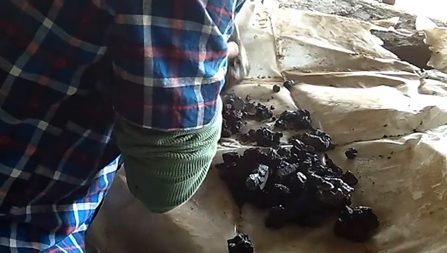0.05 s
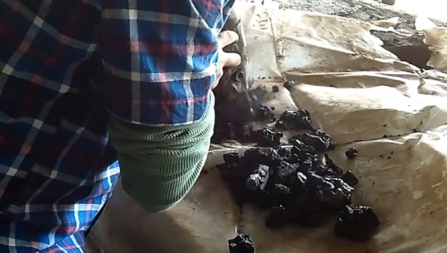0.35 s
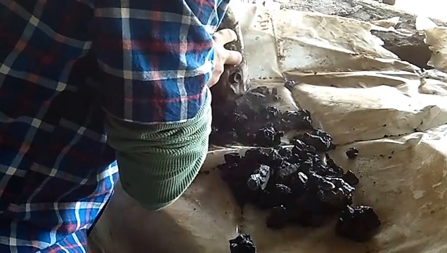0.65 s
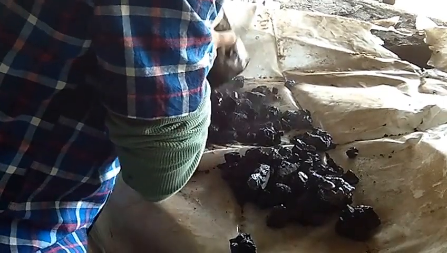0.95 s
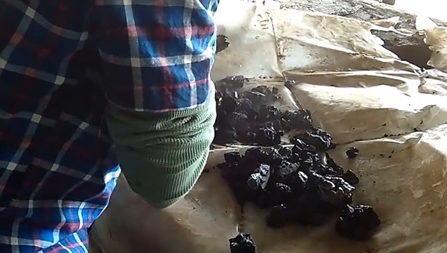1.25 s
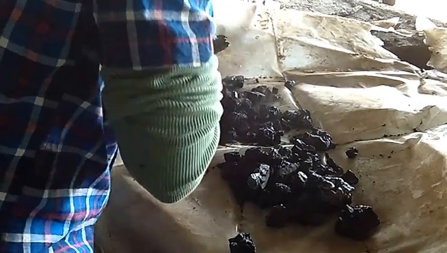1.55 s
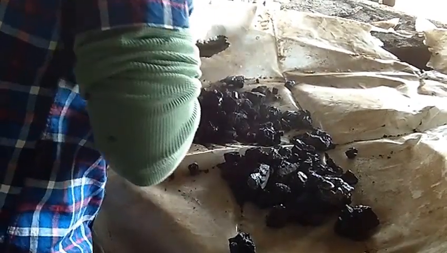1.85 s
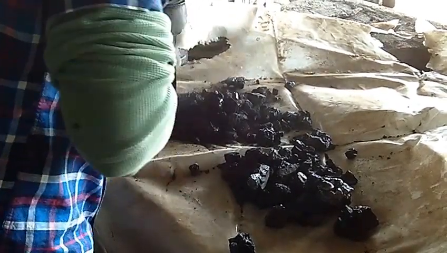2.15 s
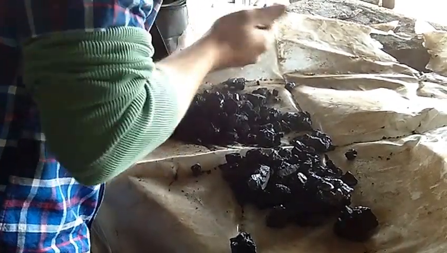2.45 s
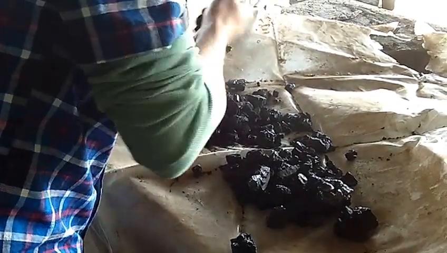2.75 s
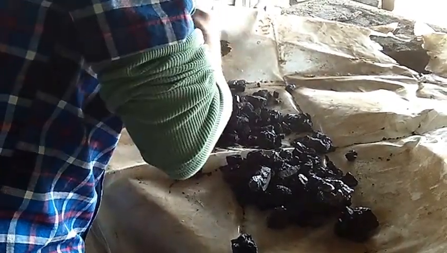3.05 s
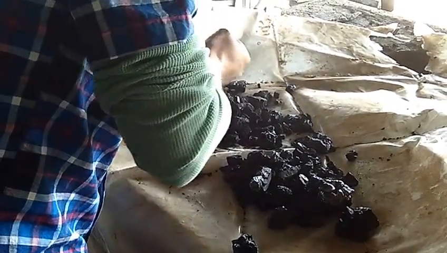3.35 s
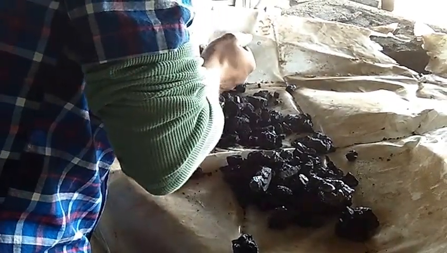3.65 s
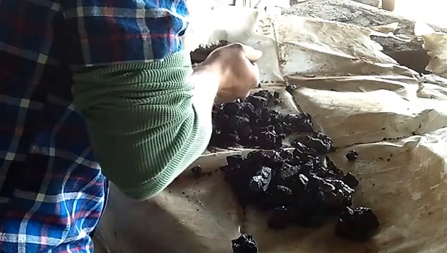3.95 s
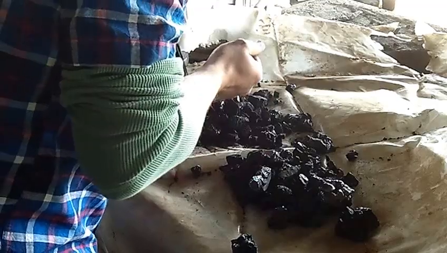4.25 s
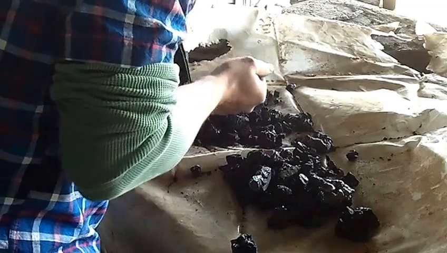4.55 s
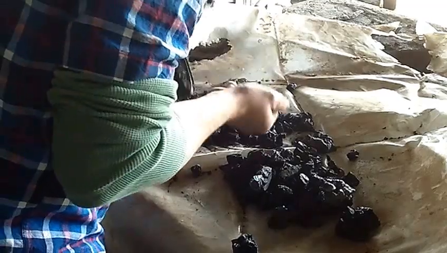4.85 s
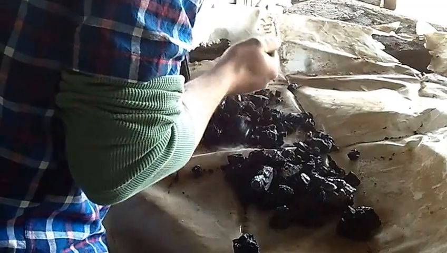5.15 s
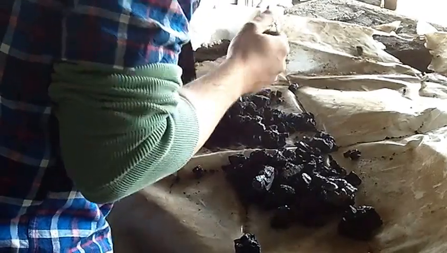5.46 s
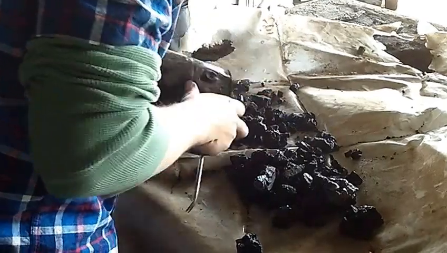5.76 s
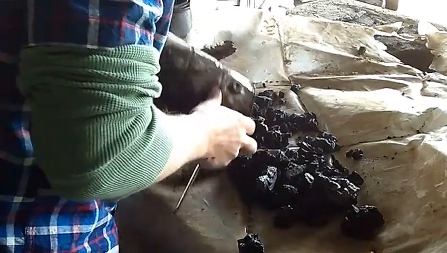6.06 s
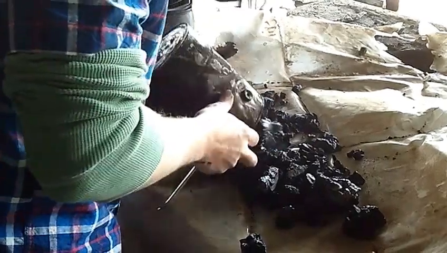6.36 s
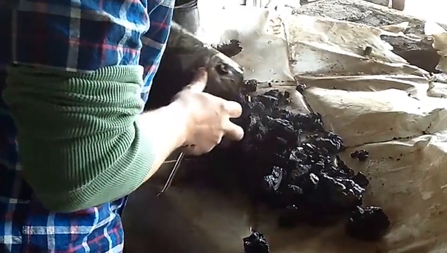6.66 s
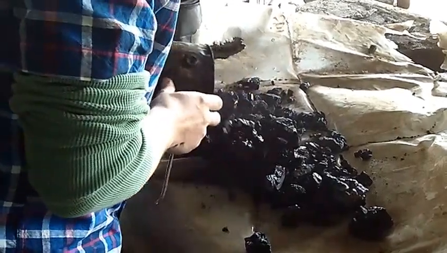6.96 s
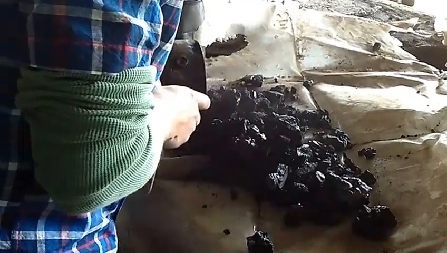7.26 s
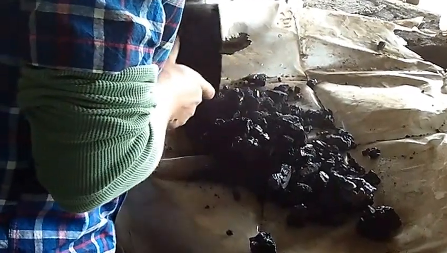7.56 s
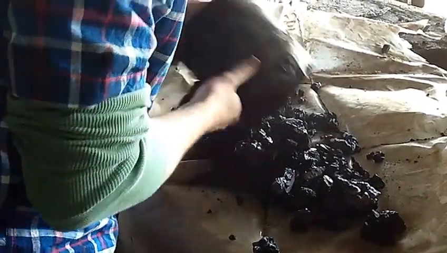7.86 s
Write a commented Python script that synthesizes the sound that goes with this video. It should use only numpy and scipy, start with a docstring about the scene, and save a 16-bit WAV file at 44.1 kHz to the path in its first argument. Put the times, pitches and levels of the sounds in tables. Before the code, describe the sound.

Baked coal lumps crack, crunch and slide out of a booming metal can onto a plastic sheet in bursts, close up in a shed.

```python
"""In a shed, close to one microphone: baked coal is worked loose in a metal can and tipped onto plastic.
Lumps crack, crush and slide in bursts; crumbs tick onto the plastic sheet after them.
The can booms and clinks when knocked, grates when coal rubs its wall and hums as lumps roll in it.
Near walls add a short, dull reverberation; between bursts, handling rustles over still air."""
import sys
import numpy as np
from scipy import signal
from scipy.fft import rfft, irfft
from scipy.io import wavfile
from scipy.ndimage import uniform_filter1d

SR = 44100
rng = np.random.default_rng(int(sys.argv[2]) if len(sys.argv) > 2 else 0)


def wav_record(signal):
    """Record a signal, one row per channel, as 16-bit PCM in the file named by sys.argv[1]."""
    frames = np.transpose(np.atleast_2d(signal))
    bounded = np.clip(frames, -1, 1)
    # unit amplitude maps onto the largest positive 16-bit level
    quanta = np.round(bounded * 32767).astype(np.int16)
    wavfile.write(sys.argv[1], SR, quanta)


N = 358091
TIME = np.arange(N) / SR

# spectrum of breaking coal: frequency_hz, density_db
COAL_SPECTRUM = [(30, -59.5), (70, -39), (120, -12), (165, -10), (210, 0), (290, -6), (420, -1), (650, -4),
                 (1250, 5), (2600, -1.5), (3800, -9.5), (6100, -15.5), (9000, -29.5), (16000, -45)]


def cracking_lumps(body_db, grit_db, hiss_db, first_break, thud_linger, lump_ring):
    """A lump cracks: a sharp break, a dying spray of splinters and five short modes of its own."""
    # single lumps snapping or landing: start_s, grit_db, body_db, hiss_db, t60_s
    cracks = [(.027, -26, -41, -52, 0.106), (.074, -35.5, -32.5, -47, 0.0345),
              (.155, -20, -49.5, -50, .028), (.19, -23.5, -30.5, -36.5, 0.24),
              (.39, -1, -18.5, -17.5, 0.0624), (.412, -4, -28.5, -20.5, 0.061),
              (.498, -24, -35, -42.5, 0.034), (0.767, -34, -52.5, -52, 0.041),
              (.848, -35, -53.5, -44.5, 0.042), (0.879, -36.5, -34.5, -64.5, 0.0355),
              (.934, -35.5, -36.5, -66, 0.068), (1.01, -30, -49.5, -44, 0.021),
              (1.025, -33, -36, -65.5, 0.048), (1.08, -27, -56.5, -46.5, 0.044),
              (1.251, -37.5, -47.5, -44.5, 0.034), (1.545, -24.5, -47.5, -48, 0.0254),
              (1.549, -7.5, -32, -26, 0.0395), (1.627, -28.5, -34.5, -45, 0.039),
              (1.709, -28, -39, -68.5, 0.026), (2.423, -27, -49.5, -41, 0.093),
              (2.517, -31, -49, -57.5, 0.051), (2.643, -36, -47, -54, 0.063),
              (3.025, -17, -31.5, -45, 0.051), (3.161, -14.5, -28.5, -34, 0.0555),
              (3.214, -16, -48.5, -32, 0.08), (3.258, -14, -33, -24, 0.0515),
              (3.281, -16.5, -55, -23, 0.0365), (3.324, -13.5, -48, -28.5, 0.065),
              (3.461, -10.5, -28, -26.5, .037), (3.498, -8, -35, -24.5, 0.038),
              (3.549, -6, -35.5, -21, 0.0638), (3.733, -29, -49.5, -45, 0.045),
              (3.808, -18, -39.5, -40, 0.066), (3.988, -32, -47, -42.5, 0.22),
              (4.063, -34, -41, -53, 0.027), (4.169, -23, -51.5, -37, 0.043),
              (4.201, -18.5, -39, -36.5, 0.127), (4.298, -13.5, -36.5, -27.5, 0.043),
              (4.435, -22, -47, -38, 0.107), (4.47, -19.5, -42.5, -33.5, 0.113),
              (4.672, -14.5, -32.5, -31, .086), (4.69, -33.5, -29.5, -25, 0.031),
              (4.721, -10, -36.5, -21, 0.0376), (4.811, -23.5, -48.5, -32.5, 0.056),
              (4.836, -22, -30, -36.5, 0.092), (4.879, -24.5, -32.5, -27, 0.085),
              (4.931, -19.5, -22, -28, 0.082), (4.979, 3.5, -8.5, -12, 0.035), (4.992, -9, -30, -26, 0.058),
              (5.02, -1, -17, -21.5, 0.0145), (5.134, -36, -45, -33, 0.028),
              (5.15, -9, -25.5, -38.5, 0.057), (5.259, -11.5, -31, -36, 0.045),
              (5.293, -22.5, -25, -38, 0.0496), (5.348, -17.5, -25.5, -48, 0.062),
              (5.491, -22.5, -55, -54.5, .02), (5.987, -12.5, -18.5, -34, 0.0584),
              (6.395, -6.5, -15, -22, 0.081), (6.406, -5.5, -16.5, -38, 0.0285),
              (6.45, 0.5, -17, -47.5, 0.0405), (6.575, -3.5, -47.5, -24, 0.036),
              (6.589, -11.5, -46, -16, 0.0424), (6.901, -18.5, -34.5, -52.5, 0.13),
              (6.925, -14.5, -31.5, -58, 0.042), (7.053, -28, -36, -38.5, 0.042),
              (7.114, -25.5, -36.5, -42, 0.086), (7.209, -23.5, -38, -50.5, .035),
              (7.65, -41, -47, -48, 0.046), (8.103, -13, -58, -29.5, 0.074)]
    t, out = TIME[:SR // 8], np.zeros(N)
    sprays = []
    for *_, t60 in cracks:
        spray = rng.standard_normal(len(t)) * from_db(-60 * t / t60)
        spray[0] += first_break * rng.choice([-1, 1])
        pitches = 800 * 2 ** rng.uniform(0, 2.6, 5)
        modes = sum(resonate(spray, hz, width_hz=230) for hz in pitches)
        sprays.append(spray + lump_ring * modes)
    breaks = butterworth(colour(np.concatenate(sprays), COAL_SPECTRUM), 2, 167, "high")
    bands = [band.reshape(len(cracks), -1) for band in registers(breaks)]
    for (s, crack, thud, snap, t60), body, grit, hiss in zip(cracks, *bands):
        body = body * (1 + thud_linger * t / t60)
        for band, db in ((body, thud + body_db), (grit, crack + grit_db), (hiss, snap + hiss_db)):
            add(out, s, band / local_rms(band, .004).max() * from_db(db))
    return out


def crushing_clumps(body_db, hiss_db, dust_db):
    """A clump gives way in a rush of fractures. Returns the crunch and its rubbing on the can's wall."""
    # crumbling clumps: peak_s, level_db, decay_s, brightness_db, rubbing_db
    crushes = [(0.088, -42.5, 0.0438, 4.5, -24), (0.254, -29.5, 0.0175, 1, -22),
               (0.293, -28.5, .027, 5.5, -17.5), (0.425, -19.5, 0.0178, 3.5, -14),
               (1.419, -46, 0.0318, 0.5, -16.5), (1.569, -37.5, 0.0165, 8, 7.5),
               (3.136, -45, 0.0424, 7.5, 8), (3.295, -36.5, 0.0296, 11, -1),
               (3.46, -38, 0.0254, 9.5, -10.5), (3.506, -31.5, 0.0363, 9.5, -1),
               (4.067, -34.5, 0.0127, 3, -10.5), (4.275, -46, 0.0526, 9.5, 4.5),
               (4.701, -40.5, 0.0368, 13.5, -4.5), (4.896, -34, 0.027, 9.5, -11),
               (4.937, -29.5, 0.0222, -1.5, -17), (5.008, -24, 0.0313, 3.5, -11),
               (5.304, -37.5, 0.0516, -3, -14), (5.92, -41, 0.0228, 8, -8),
               (6.125, -44.5, 0.0252, 7.5, -16), (6.195, -31.5, 0.0199, 9, -11),
               (6.227, -24.5, 0.0328, 8.5, -24.5), (6.355, -26.5, 0.0157, 2.5, -23.5),
               (6.409, -18.5, 0.02894, 7.5, -30.5), (6.579, -34, 0.031, 1.5, -10.5),
               (6.815, -37, 0.031, 9, 5), (7.22, -47, 0.0235, 2, -15.5), (8.079, -42, 0.081, 7.5, -3)]
    fractures = registers(grains(per_s=9000, spread_db=3.0, sharpness=7.07, tick=0.897))
    body, grit, hiss = (band / local_rms(band, 0.034) for band in fractures)
    dust = rms_one(butterworth(rng.standard_normal(N), 2, 8000, "high"))
    force, brightness, rubbing = np.zeros((3, N))
    t = TIME[:SR // 2] - .15   # zero at the peak
    for s, db, decay_s, bright_db, wall_db in crushes:
        rise_s = 0.614 * decay_s
        swell = from_db(db) * np.exp(-np.where(t < 0, (t / rise_s) ** 2, t / decay_s))
        swell = np.interp(TIME, s + t, swell, left=0, right=0)
        force += swell
        brightness += swell * from_db(bright_db)
        rubbing += swell * from_db(wall_db)
    treble = from_db(hiss_db) * hiss + from_db(dust_db) * dust
    return force * (grit + from_db(body_db) * body) + brightness * treble, rubbing * grit


def sliding_heaps(gain_db, tumble_db):
    """Fine crumbs slide along the can while a few larger pieces roll over them."""
    # heaps slipping: peak_s, level_db, swell_s, fade_s, body_db, hiss_db (the last two against the grit)
    slides = [(0.04, -48.5, -1.79, -0.35, -3.5, -12.5), (0.46, -33, 0.3961, 0.4549, -3.5, -7),
              (1.16, -47, 0.08, 0.2748, -2, -8), (1.56, -48.5, 0.23, .5, -0.5, -6),
              (1.85, -56, 0.02, 0.1, 2, -12), (3.2, -48, 0.2129, 0.27, -4.5, -3.5),
              (3.48, -42.5, 0.0968, 0.2865, -4.5, -4), (4.22, -47, 0.5272, .5, -7.5, -4),
              (4.62, -51, 0.58, 0.55, -7, -3), (4.97, -35.5, 0.35, 0.3417, -4, -8),
              (5.32, -43.5, 0.21, 0.5265, -2.5, -11), (5.9, -49, 0.1678, 0.42, 0.5, -4),
              (6.38, -35.5, 0.2245, 0.18, 3.5, -17.5), (6.6, -31.5, 0.36, .5, -4, -5),
              (6.82, -41, 0.36, .5, -2.5, -7), (8.11, -53, -5.4, -0.13, -12, -5)]
    fine = grains(per_s=3500, spread_db=3.0, sharpness=5.25, tick=1.0)
    tumbling = grains(per_s=330, spread_db=3.5, sharpness=5.0, tick=0.37, top_hz=4005)
    power = np.zeros((3, N))
    for s, db, swell_s, fade_s, body_db, hiss_db in slides:
        slip = swell_and_fade(s, db + gain_db, swell_s, fade_s)
        power += np.outer(from_db([body_db, 0, hiss_db]), slip) ** 2
    bands = registers(fine + from_db(tumble_db) * tumbling)
    return sum(band / local_rms(band, 0.074) * flow for band, flow in zip(bands, np.sqrt(power)))


def grains(per_s, spread_db, sharpness, tick, top_hz=10000):
    """Random contacts of uneven size: each is a tick plus the brief ring of one coal fragment."""
    sizes = from_db(spread_db * np.minimum(rng.exponential(1, N), 4.0)) * rng.choice([-1, 1], N)
    clicks = sizes * (rng.random(N) < per_s / SR)
    pitches = np.geomspace(300, top_hz, 22)
    fragment = rng.integers(0, len(pitches), N)
    rings = sum(resonate(clicks * (fragment == k), hz, hz / sharpness) for k, hz in enumerate(pitches))
    return colour(rms_one(rings) + tick * rms_one(clicks), COAL_SPECTRUM)


def ringing_can(push, knock_db):
    """Each blow wakes the modes near its own pitch; coal pushing on the wall drives all of them."""
    # modes of the can's wall and the air in it: pitch_hz, level_db, t60_s
    modes = [(219.2, -8, 0.082), (227.67, -2.5, 0.2015), (340.8, 0.5, 0.094), (382.7, 2.5, 0.19),
             (407, -6.5, 0.43), (495.6, -2.5, 0.253), (669.2, -3, 0.18), (766, -29.5, 0.37),
             (882.5, -6, 0.5), (929.6, -2.5, 0.235), (1290, -17, 0.6), (1379.8, -2, 0.117),
             (1577.2, 3.5, 0.049), (1688, 5, .2), (1833.4, 4, 0.055), (2098.3, 2, 0.054), (2249, -1, 0.1),
             (2520, 0, 0.39), (2848, 2, 0.21), (3290, -4.5, 0.19), (3776, -6, 0.099), (3849, 2.5, 0.052),
             (5100, -6, 0.075), (5220, -11, 0.15), (5305, -11, 0.12), (6403, -15, 0.15),
             (6500, -13.5, 0.13), (9110, -12.5, 0.16)]
    # blows on the can: start_s, level_db, centre_hz, reach_octaves
    knocks = [(0.249, -34.5, 243, 0.99), (0.39, -27, 2930, 0.196), (0.417, -28.5, 265, 0.234),
              (0.499, -23, 943, 0.19), (0.877, -35.5, 660, 0.18), (1.023, -49, 407, 1.2),
              (1.549, -39.5, 1090, 0.59), (1.552, -28, 4675, 1.29), (1.627, -36.5, 709, 0.325),
              (2.517, -42, 971, 0.69), (2.643, -54, 426, 0.79), (3.026, -33.5, 338.5, 0.6),
              (3.128, -28.5, 933, 0.19), (3.159, -28, 294.7, 0.384), (4.064, -47.5, 372, 0.68),
              (4.931, -28, 324, 1.18), (4.98, -31.5, 402, 1.3), (5.066, -29, 450, 1.25),
              (5.15, -32, 1152, 0.436), (5.196, -37, 400, 0.81), (5.988, -32, 482, 0.64),
              (6.35, -26.5, 272, 0.55), (6.42, -8, 225.8, 0.433), (7.653, -43.5, 228, 0.36),
              (8.041, -34.5, 210, 0.665), (8.104, -30.5, 222, 0.53)]
    t, out = TIME[:SR // 2], np.zeros(N)
    pitches, mode_db, _ = np.transpose(modes)
    rings = np.array([np.cos(2 * np.pi * hz * t) * from_db(-60 * t / t60) for hz, _, t60 in modes])
    for s, db, centre_hz, reach in knocks:
        nearness = np.exp(-(np.log2(pitches / centre_hz) / reach) ** 2)
        strength = from_db(db + knock_db + mode_db) * nearness
        blow = (strength * rng.choice([-1, 1], len(modes))) @ rings
        contact_hz = [.65 * centre_hz, 2 * centre_hz]   # dull blows build up slowly
        add(out, s, butterworth(blow, 4, contact_hz, "band"))
    for hz, db, t60 in modes:
        out += from_db(db) * resonate(push, hz, width_hz=np.log(1000) / (np.pi * t60))
    return out


def hollow_hum(pitch_hz, width_hz):
    """The air in the tipped can, kept ringing by rolling lumps."""
    # lumps rolling: peak_s, level_db, swell_s, fade_s
    rolls = [(0.36, -43.5, 0.22, 0.3), (6.85, -48.5, 0.81, 0.55)]
    hum = resonate(rng.standard_normal(N), pitch_hz, width_hz)
    hum = resonate(hum, pitch_hz, 2 * width_hz)
    return hum / local_rms(hum, 0.42) * sum(swell_and_fade(*roll) for roll in rolls)


def crumbs_on_sheet(per_s, spread_db, fade_db_per_s):
    """Lone crumbs hit the taut plastic, each a dry tick, growing lighter as a shower goes on."""
    # showers of crumbs after a fall: start_s, length_s, peak_db
    showers = [(0.7, 0.8, -42), (1.62, .3, -39), (5.338, .27, -26.5), (6.648, .75, -24)]
    clicks = np.zeros(N)
    for s, length_s, db in showers:
        landing = (TIME > s) & (TIME < s + length_s) & (rng.random(N) < per_s / SR)
        sizes = from_db(db - fade_db_per_s * np.abs(TIME - s) - spread_db * rng.random(N))
        clicks += landing * sizes * rng.choice([-1, 1], N)
    sheet = signal.butter(3, [600, 5200], "band", fs=SR, output="sos")
    tick_height = np.abs(signal.sosfilt(sheet, signal.unit_impulse(SR // 100))).max()
    return signal.sosfilt(sheet, clicks + 1e-18) / tick_height


def handling_rustle(stroke_db, floor_db):
    """Sleeve and hands brush the can in smooth strokes over a faint rustle that never stops."""
    # strokes: peak_s, level_db, half_length_s
    brushes = [(1.0, -58.5, 0.65), (2.092, -54.5, 0.0447), (2.232, -56.5, 0.0337), (2.507, -55.5, 0.27),
               (4.099, -61.5, 0.63), (5.6, -62.5, 0.49), (7.847, -56.5, 0.93)]
    # spectrum of the rustle: frequency_hz, density_db
    spectrum = [(60, -25), (200, -4.5), (400, -4), (800, -9), (1300, -6), (1900, -2), (2600, -8.5),
                (4000, -9), (6000, -15), (10000, -37)]
    strokes = sum(from_db(db + stroke_db) * np.exp(-((TIME - s) / half) ** 2) for s, db, half in brushes)
    return np.hypot(strokes, from_db(floor_db)) * rms_one(colour(rng.standard_normal(N), spectrum))


def shed(x, t60_s, wall_hz, wet_db, first_echo_s):
    """The direct sound plus scattered reflections from near walls, dull and soon gone."""
    t = TIME[:SR // 2]
    tail = rng.standard_normal(len(t)) * from_db(-60 * t / t60_s) * (t > first_echo_s)
    tail = butterworth(rms_one(tail) / np.sqrt(len(t)), 1, wall_hz, "low")
    return x + from_db(wet_db) * signal.oaconvolve(x, tail)[:N]


def still_air(level_db):
    """Room tone: a steady low rush with a faint hiss."""
    # spectrum of the air: frequency_hz, density_db
    spectrum = [(15, -52), (25, -12.5), (64, -2.5), (141, 0), (180, -2), (285, -6), (326, -11), (439, -7.5),
                (695, -8), (2760, -14), (4250, -11), (5730, -14.5), (6740, -16.5), (7710, -15),
                (16000, -17)]
    return from_db(level_db) * rms_one(colour(rng.standard_normal(N), spectrum))


def from_db(db):
    """Decibels to gain."""
    return 10 ** (np.asarray(db) / 20)


def rms_one(x):
    """Scale to unit power."""
    return x / np.sqrt(np.mean(x ** 2) + 1e-20)


def local_rms(x, seconds):
    """Running level over a short window."""
    return np.sqrt(np.abs(uniform_filter1d(x * x, int(seconds * SR), mode="constant")) + 1e-14)


def add(out, s, sound):
    """Mix a sound in at time s."""
    at = round(s * SR)
    out[at:at + len(sound)] += sound[:N - at]


def swell_and_fade(s, db, swell_s, fade_s):
    """Gain rising 20 dB per swell_s to time s, then falling 20 dB per fade_s; negative times swap roles."""
    return from_db(db - 20 * np.maximum((s - TIME) / swell_s, (TIME - s) / fade_s))


def resonate(x, hz, width_hz):
    """A resonance with gain 1 at its peak."""
    r = np.exp(-np.pi * width_hz / SR)
    feedback = [1, -2 * r * np.cos(2 * np.pi * hz / SR), r * r]
    return signal.lfilter(np.array([1, 0, -1]) * (1 - r * r) / 2, feedback, x + 1e-18)


def butterworth(x, order, hz, kind):
    """Low-, band- or high-pass filter."""
    return signal.sosfilt(signal.butter(order, hz, kind, fs=SR, output="sos"), x)


def registers(x):
    """Split into low body, middle grit and high hiss."""
    cuts = [(700, "low"), ([700, 3500], "band"), (3500, "high")]
    return [butterworth(x, 4, hz, kind) for hz, kind in cuts]


def colour(x, spectrum, size=2048):
    """Causal (minimum-phase) filter with the given spectrum."""
    hz, db = np.transpose(spectrum)
    grid = np.maximum(np.fft.rfftfreq(size, 1 / SR), 1)
    gain = from_db(np.interp(np.log(grid), np.log(hz), db))
    cepstrum = irfft(np.log(gain))
    cepstrum[1:size // 2] *= 2
    cepstrum[size // 2 + 1:] = 0
    return signal.oaconvolve(x, irfft(np.exp(rfft(cepstrum))))[:len(x)]


def scene():
    """Coal drives the can; both sound in the shed with the crumbs, over rustle and room tone."""
    crunch, rubbing = crushing_clumps(body_db=-6.0, hiss_db=-10.5, dust_db=-34)
    coal = crunch + sliding_heaps(gain_db=-1.0, tumble_db=-5.0)
    coal += cracking_lumps(body_db=-6.5, grit_db=-15.5, hiss_db=-5.0,
                           first_break=2.74, thud_linger=0.53, lump_ring=0.76)
    wall_push = from_db(-7.0) * coal + from_db(2.0) * rubbing
    can = ringing_can(wall_push, knock_db=-2.0) + hollow_hum(pitch_hz=227.4, width_hz=24.1)
    crumbs = crumbs_on_sheet(per_s=100, spread_db=16.5, fade_db_per_s=13.5)
    air = still_air(level_db=-62.5)
    room = shed(coal + can + crumbs, t60_s=0.393, wall_hz=5200, wet_db=-12.5, first_echo_s=0.0065)
    return (room + handling_rustle(stroke_db=-2.5, floor_db=-71) + air)[None]


def record(dry):
    """The microphone rounds the loudest peaks, notches the treble and cuts the deep bass and the top."""
    rounded = .9 * np.tanh(dry / .9)
    notched = signal.lfilter(*signal.iirnotch(7720, Q=22, fs=SR), rounded)
    thinned = butterworth(notched, 1, 50, "high")
    return signal.sosfilt(signal.ellip(10, .1, 70, 16000, fs=SR, output="sos"), thinned)


dry = scene()
out = record(dry)
wav_record(out)
```